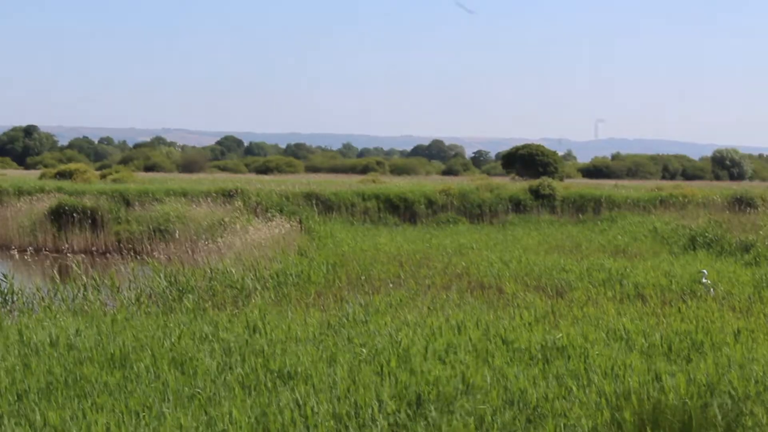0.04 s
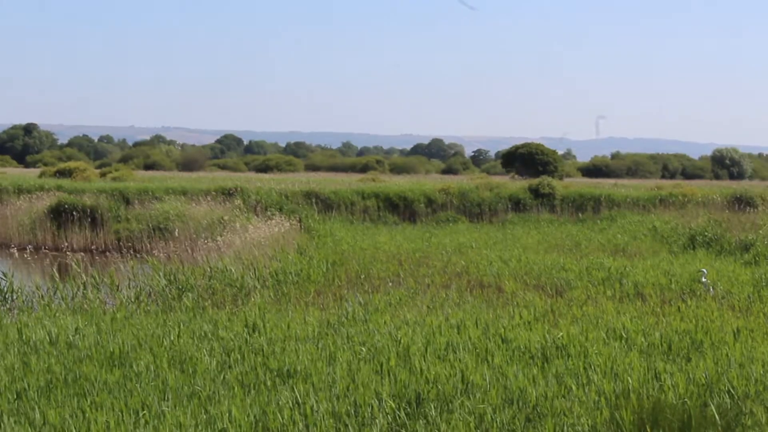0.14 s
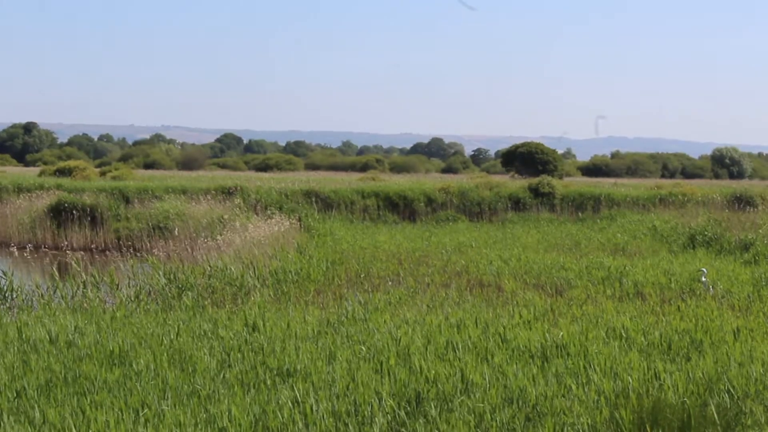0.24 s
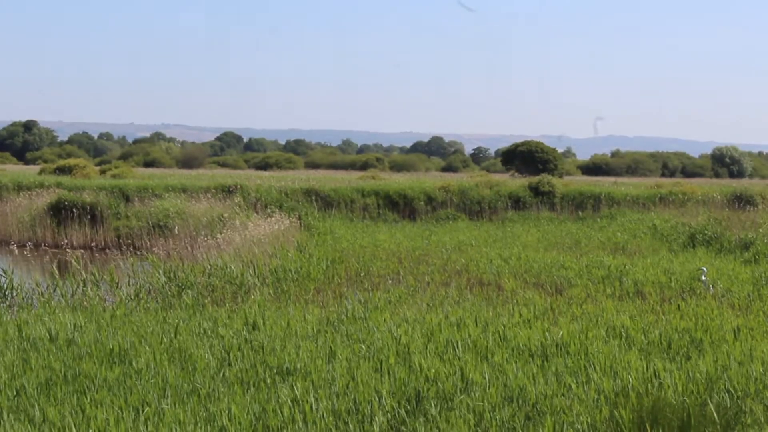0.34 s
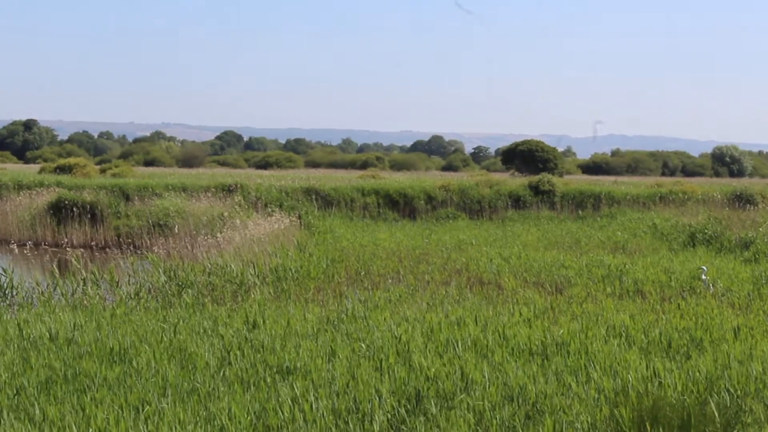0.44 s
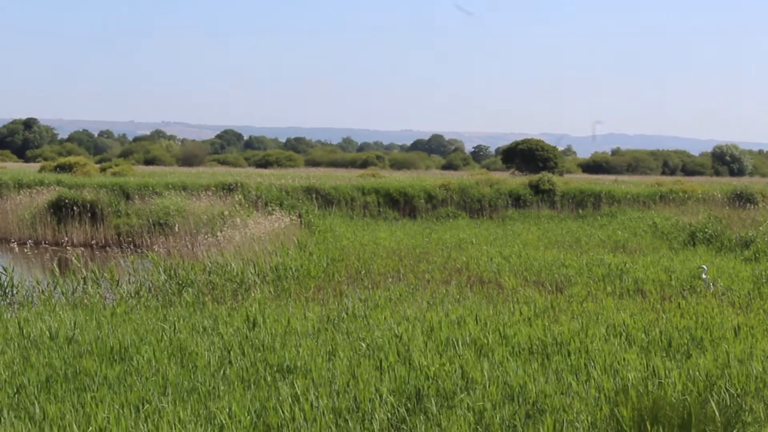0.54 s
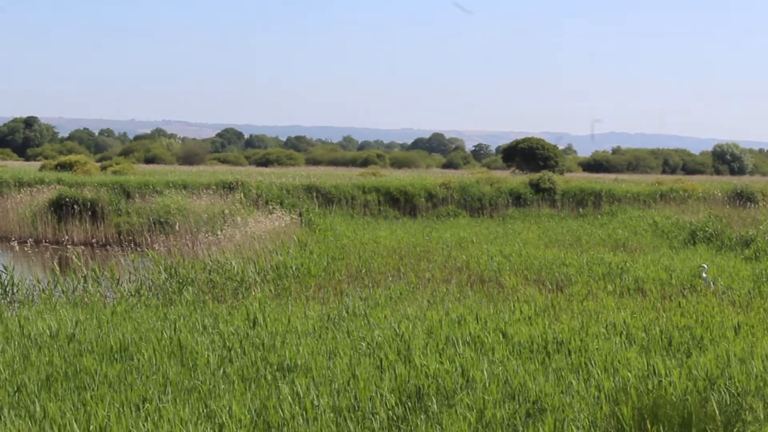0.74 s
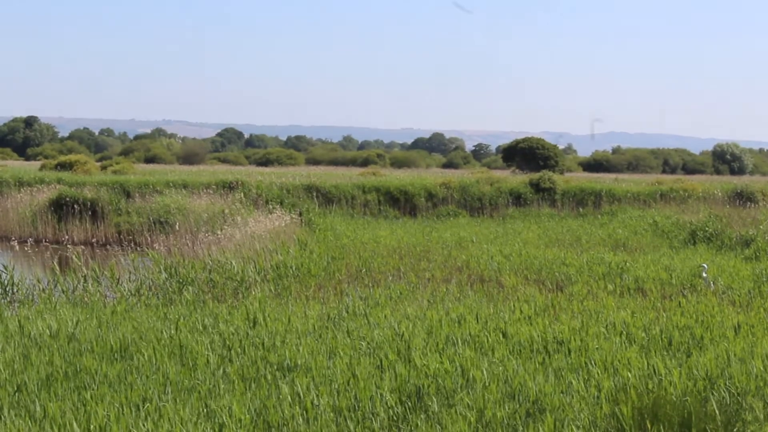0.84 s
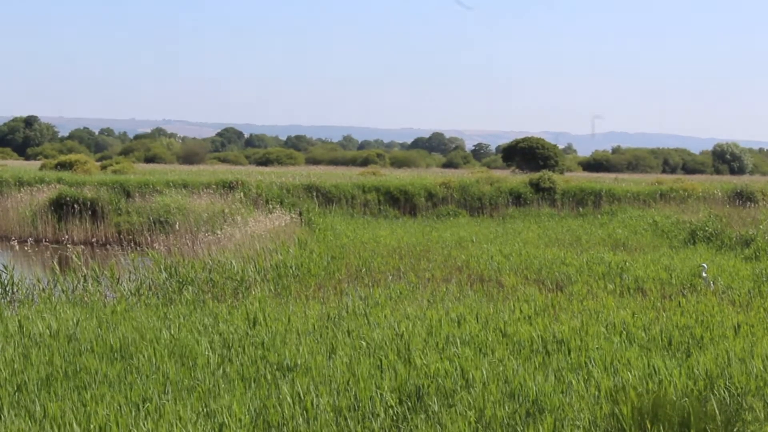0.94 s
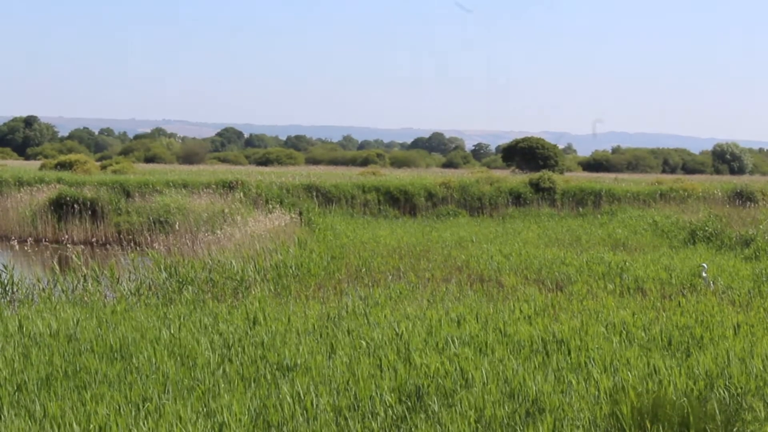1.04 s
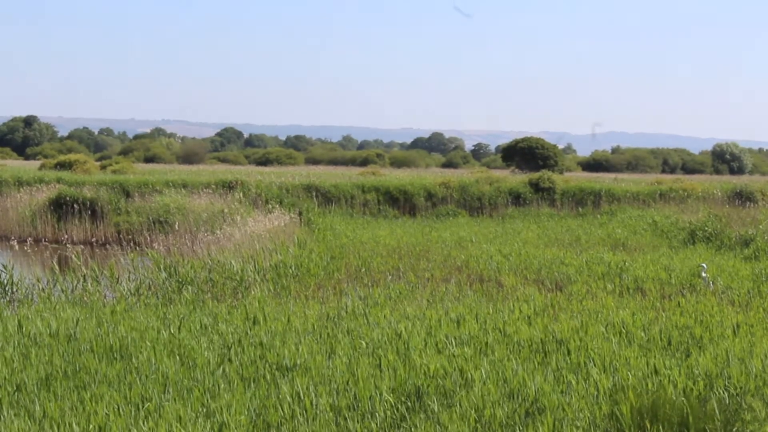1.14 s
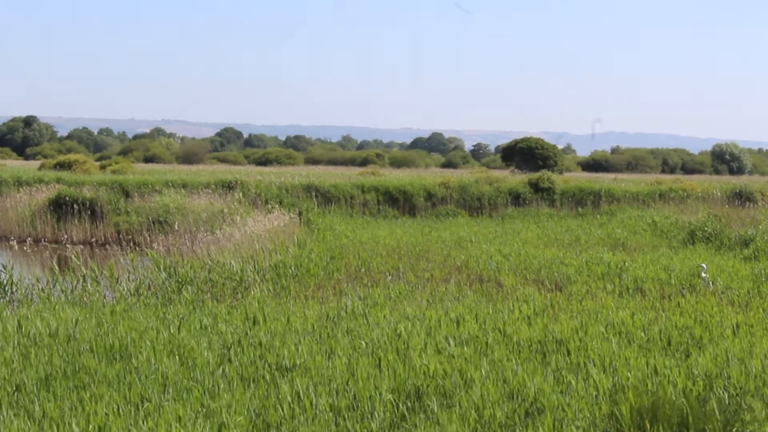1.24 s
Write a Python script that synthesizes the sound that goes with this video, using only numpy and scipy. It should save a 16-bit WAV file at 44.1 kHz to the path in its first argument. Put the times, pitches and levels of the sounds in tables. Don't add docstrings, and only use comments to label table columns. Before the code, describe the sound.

Open marsh heard through one microphone: steady reed hiss and low wind rumble, a tiny dry stem tick, then a distant bittern's single foghorn-like boom and its brief echo, with thin warbler whistles and churrs throughout.

```python
import sys
import numpy as np
from scipy import signal
from scipy.fft import rfft, irfft
from scipy.io import wavfile
from scipy.ndimage import uniform_filter1d

SR = 44100
rng = np.random.default_rng(int(sys.argv[2]) if len(sys.argv) > 2 else 0)


def boost(x):
    u = np.asarray(x, float) / 20
    return 10 ** u


def put_to_file(sound):
    columns = np.atleast_2d(sound).T
    safe = np.clip(columns, -1, 1)
    whole_steps = np.round(safe * 32767)
    wavfile.write(sys.argv[1], SR, whole_steps.astype(np.int16))


N = 57330


def unit(x):
    return x / np.sqrt(np.mean(x ** 2))


def walk(rate_hz):
    hold = int(SR / rate_hz)
    steps = np.repeat(rng.standard_normal(N // hold + 1), hold)
    return 1.3 * uniform_filter1d(uniform_filter1d(steps, hold), hold)[:N]


def sine(pitch_hz):
    return np.sqrt(2) * np.sin(2 * np.pi * np.cumsum(pitch_hz) / SR)


def coloured(spectrum, swell_db, flicker_db):
    spectrum_hz, spectrum_db = np.array(spectrum, float).T
    f_hz = np.fft.rfftfreq(N, 1 / SR) + 1e-3
    gain_db = np.interp(np.log(f_hz), np.log(spectrum_hz), spectrum_db, -90, -90)
    noise = rfft(rng.standard_normal(N)) * boost(gain_db)
    out, swell = 0, walk(3.2)
    for band in range(6, 29):
        share = np.cos(np.pi / 2 * np.clip(2 * np.log2(f_hz) - band, -1, 1)) ** 2
        out = out + irfft(noise * share, N) * boost(swell_db * swell + flicker_db * walk(9.37))
    return unit(out)


def note(t, start_s, length_s, from_hz, to_hz, level_db, wobble_hz):
    u = np.clip((t - start_s) / length_s, 0, 1)
    pitch_hz = from_hz + (to_hz - from_hz) * u + wobble_hz
    return boost(level_db) * np.sin(np.pi * u) ** .7 * sine(pitch_hz * (u > 0))


# [f/Hz, density/dB per Hz]
REED_HISS = [(120, -47), (200, -7.5), (277, -5.5), (352, -8), (462, -7.5), (1980, -15.5), (2850, -13.5),
             (10600, -31), (15500, -46.5)]
# [f/Hz, density/dB per Hz]
MARSH_ROAR = [(53, -33), (90, -2.5), (172, -5.5), (200, -9), (260, -34.5), (440, -120)]
# [f/Hz, density/dB per Hz]
MIC_RUMBLE = [(7.1, -45), (12, -3.5), (65, 4), (77, -10), (90, -10), (120, -38), (200, -120)]
# [t/s, level/dB]
MIC_GUST = [(0, -75), (.08, -63), (.17, -62), (.26, -57), (.56, -58), (.7, -61), (1.05, -58), (1.2, -64.5),
            (1.3, -53)]


def wind(t):
    hiss_db, roar_db = -50.5, -59.5
    gust_s, gust_db = np.array(MIC_GUST, float).T
    hiss = boost(hiss_db) * coloured(REED_HISS, swell_db=0.47, flicker_db=.5)
    roar = boost(roar_db) * coloured(MARSH_ROAR, swell_db=3.5, flicker_db=-1.0)
    rumble = coloured(MIC_RUMBLE, swell_db=-1.0, flicker_db=0.5)
    return hiss + roar + boost(np.interp(t, gust_s, gust_db)) * rumble


# [f/Hz, level/dB, peak t/s, swell/s]
ENGINE_TONES = [
    (71.6, -58, 0.435, 0.11),
    (67, -59.5, .8, 0.16),
    (68.3, -56, 1.272, .05),
    (285.4, -61, 1.055, 0.25),
]
# [f/Hz, width/Hz, level/dB, peak t/s, swell/s]
DRONES_BLURRED = [
    (169, 41, -53, 0.04, .06),
    (154.6, 12, -59, .86, .07),
    (345, 20, -61, 1.033, .05),
    (355, 25, -65, 0.75, 1),
]


def narrow(hz, width_hz):
    f_hz = np.fft.rfftfreq(N, 1 / SR)
    bell = np.exp(-((f_hz - hz) / width_hz) ** 2)
    return unit(irfft(rfft(rng.standard_normal(N)) * bell, N))


def far_engines(t):
    out = np.zeros(N)
    for hz, level_db, peak_s, swell_s in ENGINE_TONES:
        swell = np.exp(-((t - peak_s) / swell_s) ** 2)
        out += boost(level_db + 2.0 * walk(14.9)) * swell * sine(hz + 2.3 * walk(12.04))
    for hz, width_hz, level_db, peak_s, swell_s in DRONES_BLURRED:
        swell = np.exp(-((t - peak_s) / swell_s) ** 2)
        out += boost(level_db) * narrow(hz, width_hz) * swell
    return out


# [t/s, length/s, from f/Hz, to f/Hz, level/dB]
WARBLER_WHISTLES = [(.004, .011, 2300, 1750, -55), (.14, .035, 2550, 3300, -61),
                    (.168, .024, 3300, 4050, -60), (.478, .036, 2600, 3250, -61),
                    (.504, .03, 3150, 3950, -55), (.513, .016, 3350, 3700, -53),
                    (.585, .02, 3320, 3260, -61), (.648, .02, 2980, 3150, -54),
                    (.745, .065, 2260, 2260, -63), (.815, .02, 2160, 2120, -60),
                    (.943, .028, 2800, 3480, -52), (.985, .03, 3720, 3580, -57.5),
                    (.982, .022, 2950, 2560, -60), (1.012, .055, 2460, 2780, -57),
                    (1.055, .055, 2730, 2770, -61), (1.21, .045, 2880, 2900, -63),
                    (1.245, .022, 2800, 2250, -60)]
# [t/s, length/s, f/Hz, level/dB]
WARBLER_CHURRS = [
    (.295, .047, 3650, -54),
    (.311, .036, 3250, -59),
    (.284, .046, 4030, -63),
    (.667, .047, 3610, -53.5),
    (.69, .04, 3250, -60),
    (.655, .035, 4100, -63),
]


def warblers(t):
    quaver_hz, flutter_db, whistle_wobble_hz = 400, 1.5, 30
    churr_rate_hz, churr_depth, churr_wobble_hz = 87, .7, 55
    echo_t60_s, echo_db = .15, -6
    whistles = sum(note(t, *row, whistle_wobble_hz * walk(quaver_hz)) for row in WARBLER_WHISTLES)
    song = boost(flutter_db * walk(quaver_hz / 2)) * whistles
    for start_s, length_s, hz, level_db in WARBLER_CHURRS:
        throb = 1 - churr_depth * np.cos(2 * np.pi * churr_rate_hz * (t - start_s))
        wobble_hz = churr_wobble_hz * walk(quaver_hz)
        song = song + throb * note(t, start_s, length_s, hz, hz, level_db, wobble_hz)
    tail = rng.standard_normal(N // 4) * boost(-60 * t[:N // 4] / echo_t60_s)
    tail = tail / np.sqrt(np.sum(tail ** 2))
    return song + boost(echo_db) * signal.fftconvolve(song, tail)[:N]


# [t/s, level/dB, f/Hz, length/ms]
STEM_TICKS = [
    (.0903, -41.5, 6000, .35),
    (.0908, -49, 10000, .4),
    (.0906, -60, 13500, .4),
    (.0935, -54, 5800, .5),
    (.1727, -44, 8000, .08),
]


def stem_ticks(t):
    out = np.zeros(N)
    for tick_s, level_db, hz, length_ms in STEM_TICKS:
        bell = np.exp(-((t - tick_s) * 1000 / length_ms) ** 2)
        out += boost(level_db) * bell * np.sin(2 * np.pi * hz * (t - tick_s))
    return out


# [t/s, length/s, f/Hz, level/dB]
AIR_GULPS = [
    (0.099, .04, 349.5, -52),
    (.122, 0.039, 140, -46),
    (.166, 0.025, 145, -36),
    (.182, 0.042, 140.4, -41),
]


def bittern_gulps(t):
    return sum(note(t, start_s, length_s, hz, hz, level_db, 0)
               for start_s, length_s, hz, level_db in AIR_GULPS)


# [t/s, f/Hz, level/dB]
BOOM_TRACK = [(.213, 170, -44), (.231, 166.5, -32), (.252, 165.5, -31.3), (.27, 161, -26.8),
              (.32, 160.6, -24.3), (.39, 160.3, -24.8), (.455, 160.2, -26.8), (.5, 159.6, -31.3),
              (.536, 168, -45)]
# [t/s, f/Hz, level/dB]
RETURN_TRACK = [(.545, 168, -42), (.565, 159.5, -33.5), (.59, 157, -29.3), (.628, 156.5, -33),
                (.655, 156, -42), (.67, 157, -54), (.688, 157, -44.5), (.735, 156, -51), (.765, 156, -66)]


def bittern_boom(t):
    rise_s, fall_s = .008, 0.028
    track_s, track_hz, track_db = np.array(list(BOOM_TRACK) + list(RETURN_TRACK), float).T
    fade_in = np.clip((t - track_s[0]) / rise_s + 1, 0, 1)
    fade_out = np.clip((track_s[-1] - t) / fall_s + 1, 0, 1)
    pitch_hz = uniform_filter1d(np.interp(t, track_s, track_hz), size=400)
    swell = uniform_filter1d(np.interp(t, track_s, boost(track_db)), size=500)
    return fade_in * fade_out * swell * sine(pitch_hz)


def scene():
    t = np.arange(N) / SR
    bittern = bittern_gulps(t) + bittern_boom(t)
    return (wind(t) + far_engines(t) + warblers(t) + stem_ticks(t) + bittern)[None]


def band_limit(x):
    return signal.sosfilt(signal.butter(12, 15620, fs=SR, output="sos"), x)


def record(dry):
    return band_limit(dry)


dry = scene()
out = record(dry)
put_to_file(out)
```